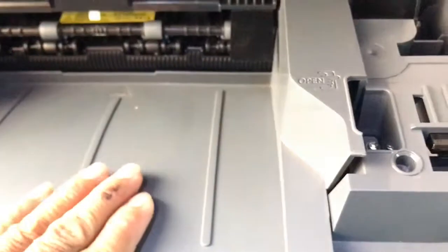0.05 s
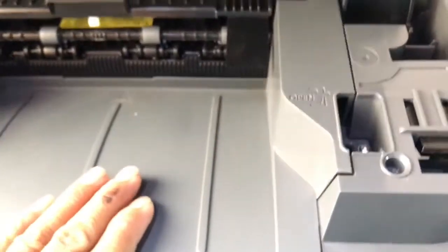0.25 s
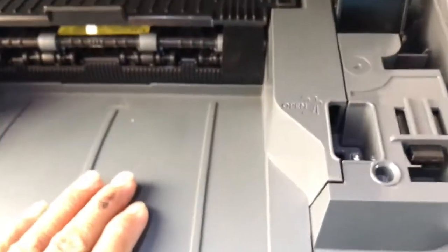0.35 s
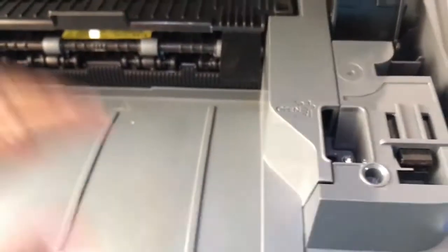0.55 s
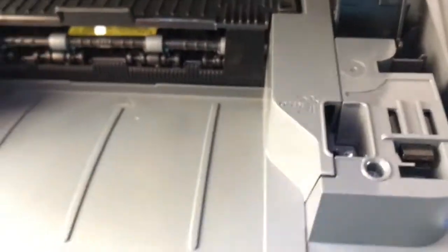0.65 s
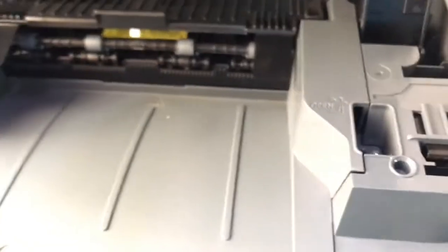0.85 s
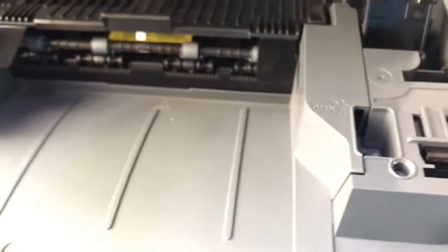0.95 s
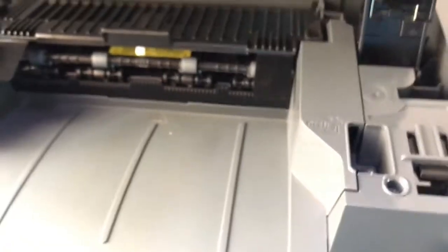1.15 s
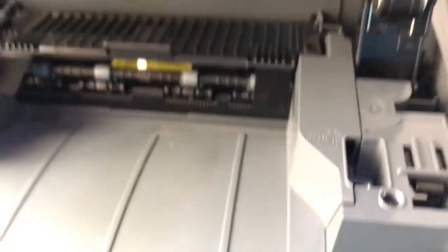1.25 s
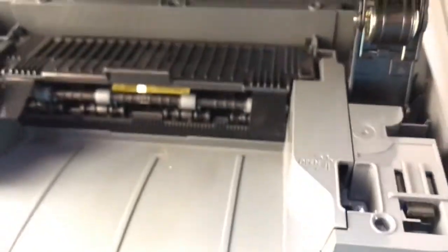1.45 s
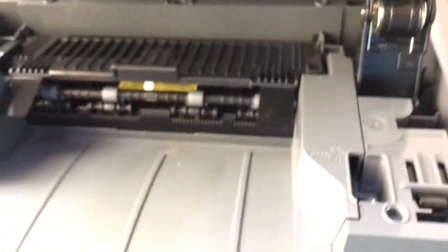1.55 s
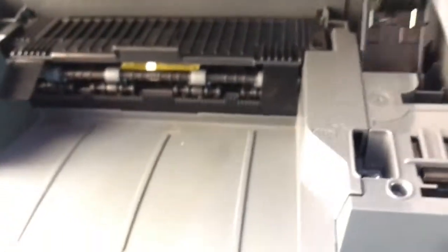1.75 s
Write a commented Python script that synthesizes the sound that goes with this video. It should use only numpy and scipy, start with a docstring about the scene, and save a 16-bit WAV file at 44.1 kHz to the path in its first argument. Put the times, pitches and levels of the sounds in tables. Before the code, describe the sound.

A printer's plastic cover snaps shut close by, with a loud, rapid cluster of clacks at about 0.25 seconds. A lighter click comes at 0.7 seconds, then a soft thud at 1 second, with faint scrapes and small clicks up to 1.5. Around 1.6 seconds come a sharper click and a hollow knock with a brief low rumble. Faint noise of a small room lies underneath.

```python
"""A printer's plastic cover and catch, handled close by in a small room. The catch snaps and the cover
slams home in a quick cluster of contacts; lighter clicks and a hollow knock follow. Each contact rings
the thin shell and thumps the casing. Under that the frame thuds, parts scrape and the body rumbles as
it is shifted, over faint room noise."""
import sys
import numpy as np
from scipy import signal
from scipy.fft import rfft, irfft, next_fast_len
from scipy.io import wavfile
from scipy.ndimage import uniform_filter1d, minimum_filter1d

SR = 44100
rng = np.random.default_rng(int(sys.argv[2]) if len(sys.argv) > 2 else 0)


def wav_record(signal):
    """Record a signal, one row per channel, as 16-bit PCM in the file named by sys.argv[1]."""
    frames = np.transpose(np.atleast_2d(signal))
    bounded = np.clip(frames, -1, 1)
    # unit amplitude maps onto the largest positive 16-bit level
    quanta = np.round(bounded * 32767).astype(np.int16)
    wavfile.write(sys.argv[1], SR, quanta)


N = 79380

# Plastic hitting plastic. Each row: start in seconds, shell level in dB, casing level in dB,
# brightness in dB, ring length factor, the struck part's pitch in Hz, its resonance in dB.
HITS = [(0.2272, -36, -52, 1, 0.87, 6200, 1), (0.2341, -27, -28, -13, 1.6, 410, 8.5),
        (0.2407, -7.5, -36, 6.5, 1.16, 4500, 1), (0.2448, -9.5, -41, 5, 1.77, 6330, -6),
        (.251, -9.5, -5.5, 4, 0.93, 3230, 7), (0.2555, -9, -48, -4, 0.6, 2770, 6.5),
        (0.2597, -11, -8.5, 4, 0.84, 1317, 9), (.266, -7, -12.5, -4.5, 0.7, 2420, 4.5),
        (0.2819, -21.5, -56, -2, 0.78, 767, 8), (0.7001, -33, -42.5, 2, 1.42, 1112, 10.5),
        (0.7034, -33, -38, -10, 0.77, 593, 21), (.7125, -33, -28, 3.5, 0.88, 1180, 8),
        (0.7208, -42.5, -42, 4.5, 0.83, 11100, 5.5), (0.7253, -48, -53, 9.5, 0.56, 14900, 14.5),
        (0.813, -61, -54, 0, 1.64, 9840, 9), (1.2492, -34.5, -37.5, -3.5, 0.88, 1875, 8.5),
        (1.2531, -40.5, -57, -12, 0.99, 1390, 10.5), (1.4234, -41.5, -54.5, -15.5, 1.32, 1946, 5.5),
        (1.469, -47, -48.5, -4, 1.9, 1200, 9), (1.4878, -29.5, -39, -4.5, 0.61, 6480, 3.5),
        (1.4911, -48, -44, -15, 0.63, 2460, 13.5), (1.6095, -22.5, -37, -3.5, 0.54, 6730, 12),
        (1.6113, -29.5, -32, -3.5, 1.1, 1662, 10), (1.6376, -22, -21, -8.5, 1.2, 560, 1.5),
        (1.6434, -25, -31, -13, 1.02, 1466, 10.5), (1.654, -32, -30, -7, 1.15, 3830, 6.5),
        (1.7313, -47, -47, -0.5, 2.6, 5040, 2.5)]
# The thin shell's broad tone. Each row: frequency in Hz, level in dB.
SHELL_EQ = [(60, -22), (250, 4), (500, 0), (850, -2), (1300, 1), (2700, 0), (3400, -2.5), (6000, -6.5),
            (10000, -13.5), (16000, -14)]
# Its resonances and one hollow. Each row: centre in Hz, width in Hz, gain in dB.
SHELL_RESONANCES = [(800, 113.4, -9.5), (1630, 99, 4), (2650, 470, 6), (4020, 210, 0), (4325, 285, 5),
                    (6250, 1600, 4.5), (8690, 260, 8)]
# Its ring-out. Each row: frequency in Hz, T60 in seconds before a hit's ring length factor.
SHELL_DECAY = [(200, 0.1), (1500, 0.08), (4000, 0.05), (8000, 0.045), (15000, 0.053)]
# Treble shelf for hits and scrapes. Each row: frequency in Hz, share of the brightness gain.
TREBLE_SHELF = [(2200, 0), (8000, 1)]
# The hollow casing's modes. Each row: pitch in Hz, level in dB, T60 in seconds.
CASING_MODES = [(227, -11, 0.13), (362, 3.5, 0.075), (379.5, -22, 0.45), (461, -20, 0.14), (556, -17, 0.1),
                (588, -13.5, 0.1), (746, -19, 0.0783)]
# Dull weight from frame and panels. Each row: start in seconds, level in dB, pitch in Hz, T60 in seconds.
FRAME_THUDS = [(0.257, -18.5, 133.5, 0.14), (0.261, -23.5, 67.7, 0.24), (0.713, -27.5, 265.8, 0.14),
               (1.026, -27.5, 192, 0.1), (1.49, -30.5, 70.2, 0.2), (1.607, -26, 75.7, 0.2),
               (1.612, -23.5, 240.5, 0.11), (1.64, -24, 70.2, 0.3), (1.639, -17.5, 130, 0.13),
               (1.6388, -12, 213, 0.078), (1.66, -22.5, 151, 0.061), (1.737, -18.5, 170, 0.054)]
# Parts sliding. Each row: start in seconds, length in seconds, level in dB, brightness in dB.
SLIDES = [(0, 0.16, -51.5, 4), (0.216, 0.016, -45, 7), (0.454, 0.079, -54, 2.5),
          (1.004, 0.069, -46.5, -0.5), (1.091, 0.082, -51, -7), (1.21, 0.046, -50, -6),
          (1.411, 0.013, -46.5, -3), (1.462, 0.059, -38.5, -11), (1.597, 0.011, -39, -1.5),
          (1.652, 0.075, -44, -0.5), (1.738, 0.054, -44, 1.5), (1.781, 0.022, -38.5, 2)]
# The tone of the sliding. Each row: frequency in Hz, level in dB.
SLIDE_EQ = [(100, -3), (300, 16.5), (700, 2.5), (1500, 4), (2800, -1), (5000, -9), (9000, -15.5),
            (16000, -18.5)]
# The rumble builds as the hand takes hold. Each row: time in seconds, level in dB.
RUMBLE_FADER = [(1.301, -61.5), (1.47, -43.5), (1.55, -45), (1.59, -50.5), (1.66, -27.5), (1.71, -43.5),
                (1.8, -46)]
# The rumble's dark tone. Each row: frequency in Hz, level in dB.
RUMBLE_EQ = [(25, -14), (70, -0.5), (130, -3.5), (300, -5.5), (520, -8.5), (800, -20.5), (3000, -34.5),
             (16000, -58)]
# The reverb's decay. Each row: frequency in Hz, T60 in seconds before REVERB_STRETCH.
REVERB_DECAY = [(100, 0.45), (400, 0.35), (2000, 0.5), (6000, 0.49), (14000, 0.23)]
# The reverb's tone. Each row: frequency in Hz, level in dB.
REVERB_EQ = [(100, -5), (400, -1.5), (1900, -2), (2800, -4.5), (5000, -2), (15000, -1)]
# The bed of room noise. Each row: frequency in Hz, level in dB.
ROOM_TONE_EQ = [(12, -42.5), (20, -17), (60, 1), (107, -12), (134, -2), (377, -15.5), (590, -26),
                (678, -22.5), (759, -30.5), (1610, -26.5), (2200, -29), (3740, -36.5), (16000, -55.5)]

SNAP_DB, SNAP_S = 1, 0.0011  # the instant of contact stands above the ring
PART_WIDTH_OCT = 0.22
PING_DB, PING_BASE_T60_S, PING_ROLLOFF_HZ = -9, 0.05, 3955
GRAIN_DB, GRAINS_PER_S = 2.5, 700
REVERB_DB, PREDELAY_S, REVERB_STRETCH = -21, .008, 0.87
ROOM_TONE_DB = -46
CEILING_DB, LOOKAHEAD_S = -.4, .0012
TOP_HZ, EDGE_HZ = 15900, 110


def contacts():
    """Each hit cracks through the shell, pings the struck part and knocks on the casing."""
    out, hz, t = np.zeros(N), np.fft.rfftfreq(N, 1 / SR), np.arange(N) / SR
    snap = 1 + (amp(SNAP_DB) - 1) * np.exp(-t / SNAP_S)
    for start, shell_db, casing_db, bright_db, stretch, part_hz, part_db in HITS:
        resonance_db = part_db * np.exp(-.5 * (np.log2((hz + 1) / part_hz) / PART_WIDTH_OCT) ** 2)
        hit_eq = amp(bright_db * along(TREBLE_SHELF, hz) + resonance_db)
        crack = irfft(rfft(noise(shell_colour)) * hit_eq, N)
        add(out, start, amp(shell_db) * fade(crack * snap, SHELL_DECAY, stretch, size=8192))
        ping = ring(part_hz, PING_BASE_T60_S * stretch, rise_s=SNAP_S)
        ping /= 1 + part_hz / PING_ROLLOFF_HZ  # smaller parts radiate less
        add(out, start, amp(shell_db + part_db + PING_DB) * ping)
        add(out, start, amp(casing_db) * casing_knock())
    return out


def shell_colour(hz):
    """The thin shell's response in dB: a dense ring with a few resonances standing out."""
    peaks_db = sum(db / (1 + (2 * (hz - f) / width) ** 2) for f, width, db in SHELL_RESONANCES)
    return along(SHELL_EQ, hz) + peaks_db


def casing_knock():
    """The hollow casing's low modes ring, with a little play in level and pitch on every hit."""
    return sum(amp(db + rng.normal(0, 1)) * ring(hz * (1 + rng.normal(0, 0.0087)), t60, rise_s=0.0012)
               for hz, db, t60 in CASING_MODES)


def thuds():
    """Soft, heavy bumps rock the frame and its large panels."""
    out = np.zeros(N)
    for start, db, hz, t60 in FRAME_THUDS:
        add(out, start, amp(db) * ring(hz, t60, rise_s=0.0053))
    return out


def scrapes():
    """Plastic slides on plastic in short, grainy swells."""
    out = np.zeros(N)
    for start, length, db, bright_db in SLIDES:
        hiss = noise(lambda hz: along(SLIDE_EQ, hz) + bright_db * along(TREBLE_SHELF, hz))
        grain = np.interp(np.arange(N) * GRAINS_PER_S / SR, np.arange(N), rng.standard_normal(N))
        friction = unit(hiss * amp(GRAIN_DB * grain))
        swell = np.sqrt(np.hanning(round(length * SR)))
        add(out, start, amp(db) * swell * friction[:len(swell)])
    return out


def handling_rumble():
    """The casing rumbles dully while it is shifted."""
    times, db = np.transpose(RUMBLE_FADER)
    fader = amp(np.interp(np.arange(N) / SR, times, db))
    return fader * noise(lambda hz: along(RUMBLE_EQ, hz))


def reverb(x):
    """The small room answers with a short, diffuse tail."""
    tail = fade(noise(lambda hz: along(REVERB_EQ, hz)), REVERB_DECAY, REVERB_STRETCH, size=32768)
    out = np.zeros(N)
    add(out, PREDELAY_S, signal.fftconvolve(x, tail / np.linalg.norm(tail)))
    return amp(REVERB_DB) * out


def room_tone():
    """A faint, steady bed of bass-heavy room noise."""
    return amp(ROOM_TONE_DB) * noise(lambda hz: along(ROOM_TONE_EQ, hz))


def amp(db):
    return 10 ** (np.asarray(db) / 20)


def unit(x):
    return x / np.sqrt(np.mean(x ** 2) + 1e-20)


def along(points, hz):
    """Read a curve of (Hz, value) points on a log frequency axis."""
    freqs, values = np.transpose(points)
    return np.interp(np.log(hz + 1), np.log(freqs + 1), values)


def noise(colour):
    """Noise of rms 1, shaped by colour(hz) in dB."""
    eq = amp(colour(np.fft.rfftfreq(N, 1 / SR)))
    return unit(irfft(rfft(rng.standard_normal(N)) * eq, N))


def fade(x, t60s, stretch, size):
    """The first size samples of x, each band dying at its own speed."""
    t, hz = np.arange(size) / SR, np.fft.rfftfreq(size, 1 / SR)
    centres, spectrum = [f for f, _ in t60s], rfft(x[:size])
    out = np.zeros(size)
    for share, (_, t60) in zip(np.eye(len(t60s)), t60s):
        band = irfft(spectrum * along(list(zip(centres, share)), hz), size)
        out += band * amp(-60 * t / (t60 * stretch))
    return out


def ring(hz, t60, rise_s):
    """One damped mode with a rounded attack."""
    t = np.arange(SR // 2) / SR
    return np.sin(2 * np.pi * hz * t) * amp(-60 * t / t60) * (1 - np.exp(-t / rise_s))


def add(track, start_s, x):
    """Mix x into the track at start_s."""
    i = max(0, round(start_s * SR))
    track[i:i + len(x)] += x[:max(0, N - i)]


def scene():
    """The mono mix: printer up front, reverb behind it, room tone underneath."""
    printer = contacts() + thuds() + scrapes() + handling_rumble()
    return (printer + reverb(printer) + room_tone())[None]


def record(dry):
    """A fast limiter holds the peaks, then a steep low-pass trims the very top."""
    span = max(2, round(2 * LOOKAHEAD_S * SR))
    needed_gain = np.minimum(1, amp(CEILING_DB) / (np.abs(dry) + 1e-9))
    limited = dry * uniform_filter1d(minimum_filter1d(needed_gain, span), span)
    size = next_fast_len(N + SR // 2)
    lowpass = .5 - .5 * np.tanh((np.fft.rfftfreq(size, 1 / SR) - TOP_HZ) / EDGE_HZ)
    return irfft(rfft(limited, size) * lowpass, size)[..., :N]


dry = scene()
out = record(dry)
wav_record(out)
```